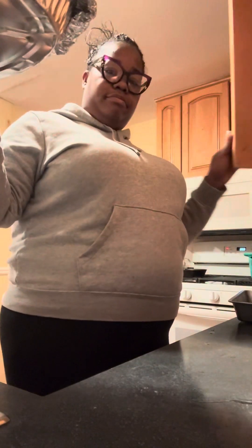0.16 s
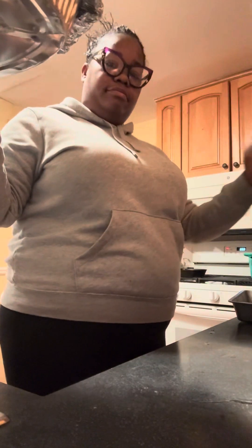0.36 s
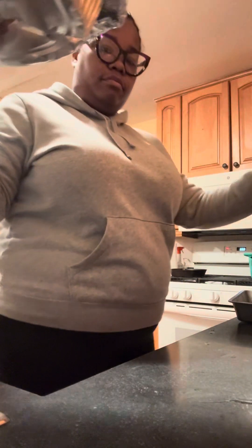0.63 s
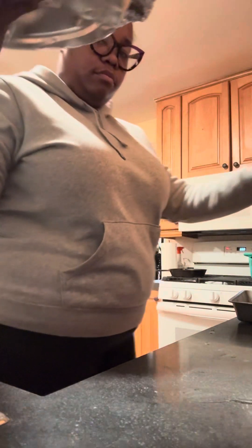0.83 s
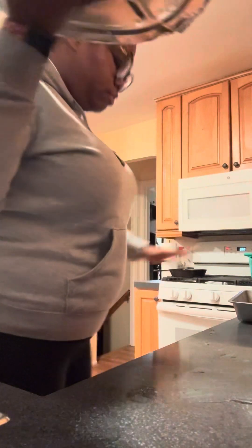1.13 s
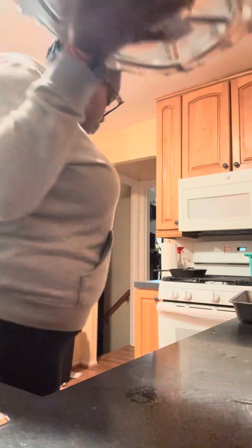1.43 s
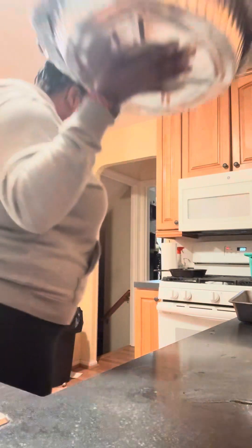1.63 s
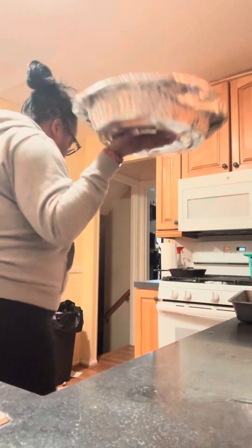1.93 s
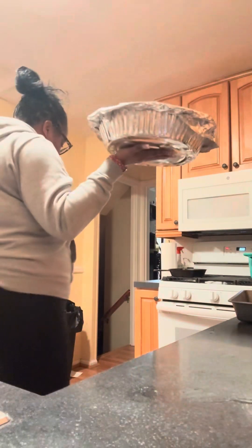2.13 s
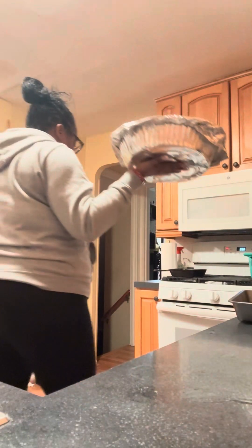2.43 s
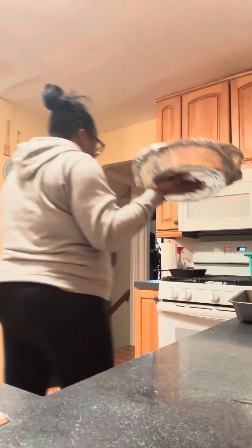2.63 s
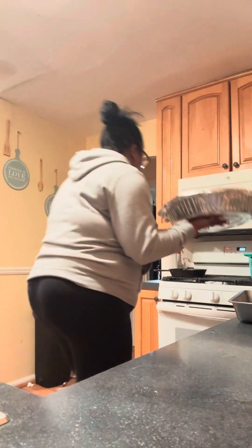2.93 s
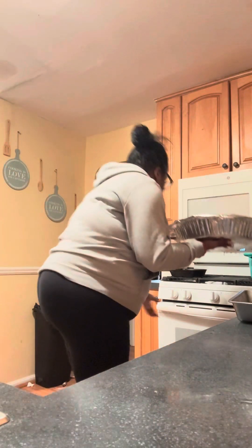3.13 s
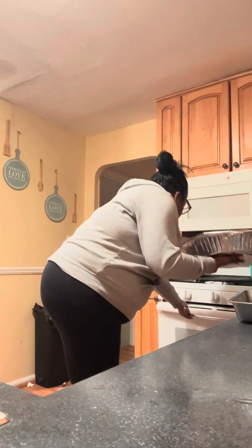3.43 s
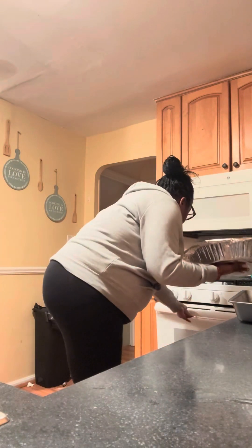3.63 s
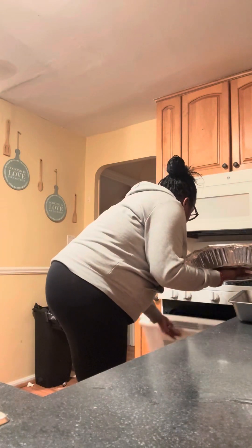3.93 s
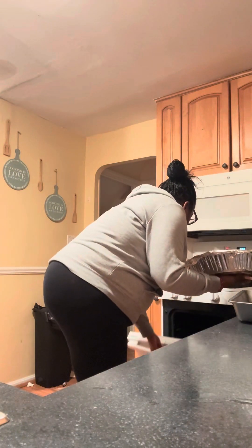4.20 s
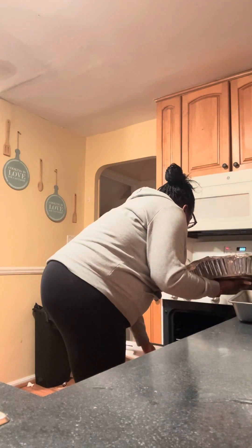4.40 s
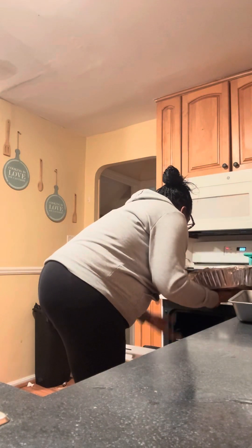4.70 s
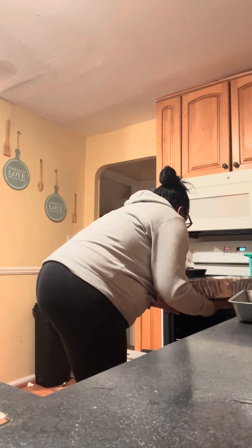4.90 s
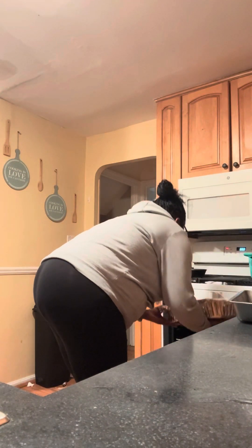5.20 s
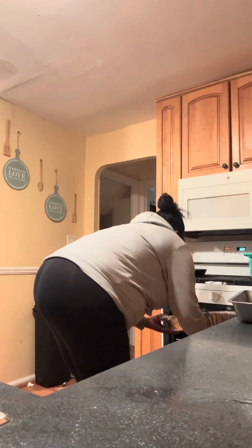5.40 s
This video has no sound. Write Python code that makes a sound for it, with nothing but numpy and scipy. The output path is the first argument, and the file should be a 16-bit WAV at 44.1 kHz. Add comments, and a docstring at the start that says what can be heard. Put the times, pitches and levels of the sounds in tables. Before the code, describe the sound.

Close on a counter in a small, hard-walled kitchen, appliances hum while water drips into a steel bowl and foil crackles. A faint hinge squeaks, then a wooden cupboard bangs very loudly and bounces twice, weaker. Heavy steps and a low floor creak follow. A sheet-metal oven door thumps open and lowers with soft even thuds; the foil pan crinkles and pops at the end.

```python
"""A small kitchen, heard by a phone with two microphone ports lying on the counter.
Appliances hum throughout; foil on a pan rustles, snaps and pops on and off, and a tap drips into a steel bowl.
A hinge sings faintly, then a wooden cupboard door bangs on its frame at 1.1 s and bounces twice.
Heavy steps and a creak follow; at 3 s a sheet-metal oven door thumps, jerks free and sinks in five soft thuds.
The foil-covered pan is lowered to the rack; its base pops at 4.5 s. Noise bursts, modes and echoes make it all."""
import sys
import numpy as np
from scipy import signal
from scipy.fft import rfft, irfft
from scipy.io import wavfile
from scipy.ndimage import uniform_filter1d

SR = 44100
rng = np.random.default_rng(int(sys.argv[2]) if len(sys.argv) > 2 else 0)


def bounce(signal):
    """Save signal as a 16-bit WAV file at the path given by the first command-line argument."""
    frames = np.transpose(np.atleast_2d(signal))
    limited = np.clip(frames, -1, 1)
    pcm = np.round(limited * 32767).astype(np.int16)
    wavfile.write(sys.argv[1], SR, pcm)


N = 244755
TIME = np.arange(N) / SR
AGE = TIME[:SR]  # seconds since a single event began

# wood on wood, spectrum of the blow: f/Hz, level/dB
WOOD_SPECTRUM = [(90, -17.5), (200, 5.5), (330, 2), (500, 1), (650, -2.5), (880, 0), (1030, -7), (1250, -6),
                 (1520, -3.5), (1720, -5), (1950, 0), (2350, 0.5), (3100, -6.5), (4400, -12), (6200, -21),
                 (8000, -51), (12000, -35.5), (16000, -45)]
FLOOR_HZ = 57.04  # the floor's own note
SNAPS_PER_S, POPS_PER_S = 850, 550  # mean rates of buckling in foil and in the pan wall


def amp(db):
    """Decibels to gain."""
    return 10 ** (np.asarray(db) / 20)


def unit(x):
    """Scale to rms 1."""
    return x / np.sqrt(np.mean(x ** 2))


def curve(rows, axis=1):
    """One column of a table, joined by straight lines in time."""
    rows = np.array(rows)
    return np.interp(TIME, rows[:, 0], rows[:, axis])


def during(rows):
    """1 from the first row of a table to the last, otherwise 0."""
    return (TIME > rows[0][0]) & (TIME < rows[-1][0])


def fade(t60):
    """Exponential decay by 60 dB in t60 seconds."""
    return np.exp(-np.log(1000) * AGE / t60)


def swell_in(rise):
    """Exponential build-up with a time constant of rise seconds."""
    return 1 - np.exp(-AGE / rise)


def add(track, s, x):
    """Mix x into the track from time s on."""
    start = max(int(s * SR), 0)
    part = x[..., :max(N - start, 0)]
    track[..., start:start + part.shape[-1]] += part


def convolve(x, response):
    """Filter by an impulse response, keeping the length."""
    return signal.fftconvolve(x, response, axes=-1)[..., :x.shape[-1]]


def walk(rate):
    """Slow chance with a spread of 1, drawn anew rate times a second and smoothed."""
    hold = int(SR / rate)
    steps_held = np.repeat(rng.standard_normal(N // hold + 1), hold)
    smooth = uniform_filter1d(uniform_filter1d(steps_held, hold), hold)
    return unit(smooth[:N])


def click(points, tilt_db=0, size=4096):
    """Minimum-phase pulse of unit energy with a (Hz, dB) spectrum, tilted in dB per octave."""
    octave = np.log2(np.maximum(np.fft.rfftfreq(size, 1 / SR), 1))
    hz, db = np.transpose(points)
    level_db = np.interp(octave, np.log2(hz), db) + tilt_db * octave
    # folding the cepstrum forward in time makes the pulse causal
    cepstrum = irfft(np.log(amp(level_db)))
    cepstrum[1:size // 2] *= 2
    cepstrum[size // 2 + 1:] = 0
    pulse = irfft(np.exp(rfft(cepstrum)))
    return pulse / np.linalg.norm(pulse)


def contact(points, t60, rise=.001, tilt_db=0):
    """A blow: surfaces meet and chatter as a noise burst, coloured by the spectrum of the contact."""
    force = rng.standard_normal(SR) * fade(t60) * swell_in(rise)
    force /= np.linalg.norm(force)
    # as much energy as 10 ms of rms 1
    return convolve(force, click(points, tilt_db)) * np.sqrt(SR / 100)


def ring(modes, ratio=1, tilt_db=0):
    """Modes that build up and die away; the place of the blow tilts their balance (dB per octave)."""
    tones = 0
    for hz, db, t60, rise in modes:
        octaves_up = np.log2(hz / modes[0][0])
        tone = np.sin(2 * np.pi * hz * ratio * AGE)
        tones = tones + amp(db + tilt_db * octaves_up) * tone * fade(t60) * swell_in(rise)
    return tones


def sparkle(modes, spread=0.75, rise=0.0013):
    """High modes of loosely held things: pitch jitters, and each reaches the two ports with its own phase."""
    blur_hz_per_khz = 2
    tones = 0
    for hz, db, t60 in modes:
        ports = rng.uniform(0, 2 * np.pi) + spread * rng.standard_normal((2, 1))
        phase_step = np.sqrt(2 * np.pi * blur_hz_per_khz * hz / 1000 / SR)
        jitter = np.cumsum(rng.standard_normal(SR)) * phase_step
        tones = tones + amp(db) * fade(t60) * np.sin(2 * np.pi * hz * AGE + ports + jitter)
    return tones * swell_in(rise)


def thud(hz, length):
    """A soft push: a few low cycles that swell and fade."""
    swell = (2 * AGE / length) ** 2
    return swell * np.exp(1 - swell) * np.sin(2 * np.pi * hz * AGE)


def buckles(size, snaps_per_s, spread_db):
    """Tiny snaps of very unequal size, at random moments."""
    sizes = amp(spread_db * np.minimum(rng.exponential(size=size), 4)) * rng.standard_normal(size)
    return sizes * (rng.random(size) < snaps_per_s / SR)


def snap_cloud(length, snaps_per_s, spread_db):
    """A cloud of tiny snaps that swells quickly and dies."""
    cloud = swell_in(0.4 * length) * np.exp(-1.8 * (AGE / length) ** 2)
    snaps = buckles(SR, snaps_per_s, spread_db) * cloud
    # as much energy as rms 1 over the length and 3.3 ms more
    return snaps * np.sqrt((length + 0.0033) * SR) / (np.linalg.norm(snaps) + 1e-12)


def diffuse(size):
    """Noise at two nearby microphone ports: alike in the bass, most different around 1 kHz."""
    # difference between the ports: f/Hz, side level/dB
    port_width = [(120, -32), (500, -5.5), (950, 1.5), (1900, -5.5), (5500, -0.5), (10000, -4)]
    mid, side = rng.standard_normal((2, size))
    hz, db = np.transpose(port_width)
    bins_hz = np.maximum(np.fft.rfftfreq(size, 1 / SR), 1)
    gain = amp(np.interp(np.log(bins_hz), np.log(hz), db))
    side = irfft(rfft(side) * gain, size)
    return np.array([mid + side, mid - side])


def kitchen(dry, direct_db, pan_db=0):
    """Direct sound plus the dense echo of hard walls, whose treble dies slightly sooner."""
    t60_s, treble_t60_s = 0.33, 0.32
    echoes = diffuse(SR)
    low = signal.sosfilt(signal.butter(1, 3500, fs=SR, output="sos"), echoes)
    response = low * fade(t60_s) + (echoes - low) * fade(treble_t60_s)
    response *= swell_in(0.00057)
    response /= np.linalg.norm(response[0])
    response[:, 0] += amp(direct_db)  # a nearer source has more direct sound
    ports = np.array([dry * amp(pan_db / 2), dry * amp(-pan_db / 2)])
    return convolve(ports, response)


def appliances():
    """Wavering motor hum over a soft rush of fan and room air; the higher notes waver more."""
    # motor notes: f/Hz, level/dB rms
    motor_notes = [(59.2, -47.5), (124.5, -53.5), (251.5, -55.5), (344.5, -68), (376.8, -66)]
    # spectrum of fan and room air: f/Hz, level/dB
    air_spectrum = [(20, -22.5), (38, -14.5), (55, 8.5), (85, -8.5), (130, -3), (180, -8), (260, -14),
                    (370, -9.5), (500, -15), (750, -19.5), (1200, -29.5), (1700, -29.5), (2400, -29.5),
                    (4000, -40), (6200, -44.5), (8200, -75.5), (10800, -47.5), (16000, -52)]
    # strength of the air: t/s, level/dB
    air_levels = [(0, -49), (1, -50), (2.2, -46.5), (3.4, -46), (4.5, -49), (5.55, -46)]
    hum = 0
    for hz, db in motor_notes:
        waver = np.sqrt(hz / motor_notes[0][0])
        level = np.sqrt(2) * amp(db + waver * walk(7))
        phase = 2 * np.pi * hz * TIME + .35 * waver * walk(5 * waver)
        hum = hum + level * np.sin(phase)
    air = unit(convolve(diffuse(N), click(air_spectrum)[None]))
    return hum + air * amp(curve(air_levels) + .5 * walk(6))


def foil_and_bang_edge(spread_db=2.5):
    """Foil rustles unevenly; clouds of snaps make its flexes and the bright edge of the cupboard's bang."""
    # how much the foil is handled: t/s, level/dB
    handling_levels = [(0, -68), (.3, -68.5), (.6, -74), (2.05, -70), (2.28, -57), (2.45, -65),
                       (2.6, -62.5), (2.9, -75), (3.45, -68), (3.85, -82), (4.7, -82), (4.95, -56.5),
                       (5.12, -60.5), (5.36, -66), (5.55, -53)]
    # bursts: the bright edge of the bang at 1.115 s, otherwise flexing foil:
    # t/s, crackle level/dB, sizzle level/dB, length/s
    treble_bursts = [(0.151, -59.5, -66, 0.025), (0.19, -56.5, -76, 0.0083), (0.973, -69, -69, 0.057),
                     (1.025, -51, -62.5, 0.072), (1.115, -28.5, -43, 0.02), (2.145, -56, -68, 0.03),
                     (2.184, -55.5, -64, 0.09), (2.728, -60, -73, 0.072), (3.016, -44, -55, 0.059),
                     (3.296, -63, -76, 0.028), (4.038, -65, -75, 0.023), (4.336, -66, -72, 0.014),
                     (4.594, -59, -73, 0.022), (4.835, -45.5, -55.5, 0.05), (5.039, -50.5, -65.5, 0.032),
                     (5.172, -63, -61, 0.033), (5.198, -51.5, -66, 0.048), (5.322, -78, -62, 0.033),
                     (5.406, -67, -63, 0.04)]
    # spectra of the two layers: f/Hz, level/dB
    crackle_spectrum = [(400, -5), (700, 7.5), (920, -0.5), (1200, -5), (1700, -6.5), (2350, 7.5),
                        (3800, -1), (5500, -1), (6600, -6.5), (8000, -54.5), (16000, -48)]
    sizzle_spectrum = [(5000, -70.5), (8000, -42.5), (10500, 21), (15000, 16.5), (17000, 14)]
    crackle = unit(buckles(N, SNAPS_PER_S, spread_db)) * amp(curve(handling_levels))
    sizzle = amp(-12) * crackle
    for s, crackle_db, sizzle_db, length in treble_bursts:
        snaps = snap_cloud(length, SNAPS_PER_S, spread_db)
        add(crackle, s, amp(crackle_db) * snaps)
        add(sizzle, s, amp(sizzle_db) * snaps)
    layers = convolve(crackle, click(crackle_spectrum)) + convolve(sizzle, click(sizzle_spectrum))
    return kitchen(layers, direct_db=-5)


def tap_drips():
    """A drop rings the bowl and traps a bubble whose pitch wobbles slightly before it dies."""
    # drips into a steel bowl of water: t/s, bubble f/Hz, bubble level/dB, bowl level/dB
    drip_events = [(0.027, 5570, -52.5, -83), (0.23, 1380, -39, -54), (0.232, 1157, -44.5, -68),
                   (0.722, 3040, -53, -54), (0.967, 3020, -61.5, -66.5), (1.755, 4280, -59.5, -78),
                   (2.638, 2985, -51.5, -54.5), (2.927, 5300, -65, -79), (3.941, 2520, -50.5, -52.5),
                   (3.967, 2644, -57.5, -77), (4.773, 4050, -60, -66)]
    # ring of the bowl: f/Hz, level/dB, t60/s
    bowl_modes = [(1394, 3.5, 0.035), (2103, 10, 0.025), (2540, -2.5, 0.07), (2820, -7.5, 0.1),
                  (3130, -9, .15), (4000, -17, .08), (4700, -22.5, 0.14), (5300, -16.5, .05)]
    bubble_s = 0.017  # how long a bubble sings
    drops = np.zeros(N)
    life = np.exp(-(AGE / bubble_s) ** 2) * swell_in(0.0062)
    for s, hz, bubble_db, bowl_db in drip_events:
        pitch = hz * (1 + .03 * walk(1200)[:SR])
        bubble = np.sin(2 * np.pi * np.cumsum(pitch) / SR) * life
        bowl = sparkle(bowl_modes, rise=0.0063)[0]
        add(drops, s, amp(bubble_db) * bubble + amp(bowl_db) * bowl)
    # the sink is close to the phone, so little of the room is heard
    return kitchen(drops, direct_db=10)


def pan_pops():
    """Ribs of the pan give way and ring its thin wall, tuned anew for each pop; the base pops once."""
    # the ribbed wall pops and rattles: t/s, level/dB, length/s
    rib_pops = [(0.194, -49.5, 0.048), (0.313, -54.5, 0.014), (0.385, -51.5, 0.0096), (2.183, -55, 0.025),
                (2.757, -58, 0.028), (3.516, -57, 0.043), (4.845, -45, 0.029), (4.891, -53, 0.071),
                (5.06, -56, 0.035), (5.203, -54, 0.035), (5.429, -61, 0.016)]
    # ring of the thin aluminium wall: f/Hz, level/dB, t60/s
    wall_modes = [(954, -0.5, 0.024), (1205, -7, 0.036), (1560, 2.5, 0.017), (1866, -2.5, 0.03),
                  (2238, 4, 0.021), (2506, 2, 0.024), (3050, -4, 0.02), (3450, 5, 0.012)]
    # ring of the base as it flips when gripped: f/Hz, level/dB, t60/s
    base_modes = [(920, -42, 0.028), (1080, -41, .03)]
    wall_bend, base_pop_s = .07, 4.5  # spread of the wall's pitch (fraction); time of the base pop
    pops = np.zeros(N)
    for s, db, length in rib_pops:
        bend = 1 + wall_bend * rng.standard_normal()
        wall = sparkle([(hz * bend, mode_db, t60) for hz, mode_db, t60 in wall_modes])[0]
        snaps = snap_cloud(length, POPS_PER_S, spread_db=2.5)
        add(pops, s, amp(db) * convolve(snaps, wall / np.linalg.norm(wall)))
    add(pops, base_pop_s, sparkle(base_modes, rise=0.0043)[0])
    return kitchen(pops, direct_db=-2)


def foil_snaps():
    """A crease flips over with one dry click."""
    # single sharp snaps close to the phone: t/s, level/dB
    snap_events = [(0.197, -48), (4.546, -66.5)]
    # their spectrum: f/Hz, level/dB
    snap_spectrum = [(500, -23), (2000, 10), (3500, -1), (6200, 5), (8000, -26), (12000, -2.5),
                     (16000, -15)]
    snaps = np.zeros(N)
    for s, db in snap_events:
        add(snaps, s, amp(db) * contact(snap_spectrum, t60=0.024, rise=0.0005))
    return kitchen(snaps, direct_db=2.0)


def hinge():
    """The turning hinge sticks and slips: one thin, rough note with jittering pitch and fluttering level."""
    # faint song of the hinge: t/s, f/Hz, level/dB
    hinge_song = [(.3, 2480, -84), (.4, 2540, -74), (.44, 2500, -85), (.53, 2510, -74), (.57, 2510, -64),
                  (.6, 2510, -77), (.68, 2470, -69), (.78, 2420, -77), (.85, 2450, -65), (.92, 2477, -74.5),
                  (1.0, 2450, -81.5)]
    pitch = curve(hinge_song) * (1 + .035 * walk(1100) + .006 * walk(35))
    grip = np.maximum(walk(110) + 2.2, 0)
    song = unit(np.sin(2 * np.pi * np.cumsum(pitch) / SR) * grip)
    return kitchen(song * amp(curve(hinge_song, axis=2)) * during(hinge_song), direct_db=7.0)


def wood_crack(tilt_db):
    """The door's edge meets the frame."""
    return contact(WOOD_SPECTRUM, t60=0.025, rise=0.0055, tilt_db=tilt_db)


def cupboard(crack_pan_db=-1, ring_pan_db=-3, panel_db=-16, shelves_db=3):
    """Each bang cracks on the frame in several contacts, rings panel and shelves, and booms in the carcass."""
    # door hits frame: t/s, crack level/dB, boom level/dB, air thump level/dB, thump f/Hz, boom tilt/(dB/octave)
    slam_events = [(1.1186, -15.5, -3.5, -31, 56.6, 0), (1.5139, -23, -19.5, -12, 95.2, 4.5),
                   (1.824, -35.5, -18.5, -18.5, 55.2, -1.5)]
    # low modes of door and carcass: f/Hz, level/dB, t60/s, build-up/s
    # (the close pair beats, so the boom holds and then drops)
    carcass_modes = [(56.5, 4.5, 0.4, 0.084), (82.93, -10, 0.93, 0.093), (128.2, -5, 0.45, 0.0027),
                     (131.04, 0, 0.43, 0.024), (145, -13.5, 0.44, 0.0076), (170, -11.5, 0.21, 0.052),
                     (205.9, -9, 0.45, 0.047), (240.6, -13.5, 0.41, 0.0087), (301, -26.5, 0.58, 0.0065),
                     (383, -19, 0.31, 0.011), (451.4, -25, 0.47, 0.0081)]
    # ring of the door panel: f/Hz, level/dB, t60/s
    panel_modes = [(883, -1, 0.33), (1367, -7, 0.29), (1529, -9, 0.34), (1884, -4, 0.35), (1960, -1, 0.2),
                   (2056, 0, 0.19), (2239, -6, 0.31), (2449, -3, 0.23), (2702, -9, 0.27), (2842, -4, 0.2),
                   (3542, -12, 0.28), (3967, -13, 0.27), (4296, -25, 0.35), (4678, -12, 0.22),
                   (5179, -20, 0.3), (5696, -21, 0.28)]
    # things on the shelves ring on faintly: f/Hz, level/dB, t60/s
    shelf_modes = [(1272, -24, .75), (1534, -17, .36), (1612, -22, .44), (2022, -21, .4), (2335, -25, .45),
                   (2470, -26, .5), (2590, -28, .45), (2630, -25, .6), (3461, -33, .6), (4385, -33, .6),
                   (4440, -36, .55), (5380, -35, .48), (6115, -42, .42)]
    # further contacts of each bang, the main one at 1.122 s, then catch and panel rattling: t/s, level/dB
    further_contacts = [(1.122, -12.5), (1.142, -22.5), (1.1596, -20), (1.208, -30), (1.5165, -22.5),
                        (1.526, -33), (1.548, -31), (1.566, -39.5), (1.578, -29.5), (1.853, -37.5)]
    # the catch brushes the door just before it lands: t/s, level/dB
    touch_events = [(1.085, -30), (1.113, -28.5), (1.4437, -39.5), (1.506, -26.5)]
    hard_db, dulling = -15.5, 0.061  # a softer crack loses dulling dB per octave for each dB below hard_db
    thump_s = 0.067  # length of the push of trapped air
    sway_s, sway_db, sway_hz = 0.0704, -6, 64  # the cupboard sways back once: delay, relative level, pitch
    touch_boom_db, touch_pitch = 7, 1.33  # a touch rings the carcass higher

    cracks, booms, rings = np.zeros(N), np.zeros(N), np.zeros((2, N))
    for s, crack_db, boom_db, thump_db, thump_hz, tilt_db in slam_events:
        add(cracks, s, amp(crack_db) * wood_crack(dulling * (crack_db - hard_db)))
        add(booms, s, amp(boom_db) * ring(carcass_modes, tilt_db=tilt_db))
        add(booms, s, amp(thump_db) * thud(thump_hz, thump_s))
        add(booms, s + sway_s, amp(thump_db + sway_db) * thud(sway_hz, thump_s))
        add(rings, s, amp(crack_db + panel_db) * sparkle(panel_modes))
        add(rings, s, amp(crack_db + shelves_db) * sparkle(shelf_modes))
    for s, db in further_contacts:
        # tilted duller than the slam cracks
        add(cracks, s, amp(db) * contact(WOOD_SPECTRUM, t60=0.02, rise=0.0018, tilt_db=-3))
        add(rings, s, amp(db + panel_db) * sparkle(panel_modes))
    for s, db in touch_events:
        add(cracks, s, amp(db) * wood_crack(tilt_db=-4.5))
        add(booms, s, amp(db + touch_boom_db) * ring(carcass_modes, touch_pitch))
        add(rings, s, amp(db + panel_db) * sparkle(panel_modes))
    rings = rings * amp(2 * walk(59.36))  # loose things ring unevenly
    ring_pan = amp(np.array([[ring_pan_db], [-ring_pan_db]]) / 2)
    return booms + rings * ring_pan + kitchen(cracks, direct_db=-4.0, pan_db=crack_pan_db)


def floor_sounds():
    """Low thuds through the floor from steps and oven door, shoe taps and a creak of a slipping board."""
    # low thuds through the floor: steps, then two from the oven door at 3.02 and 3.12 s: t/s, level/dB
    floor_thuds = [(1.977, -31.5), (2.124, -33), (2.587, -25.5), (2.807, -31), (3.019, -30), (3.123, -35)]
    # shoe taps on the floor: t/s, level/dB
    shoe_taps = [(2.139, -30), (2.165, -40), (2.584, -45.5)]
    # spectrum of sole on floor: f/Hz, level/dB
    sole_spectrum = [(150, 8.5), (330, -0.5), (480, 5.5), (740, 5.5), (900, -5), (1200, -21.5),
                     (3000, -14.5), (7000, -49), (16000, -38)]
    # a board creaks under the turning foot: t/s, slip rate f/Hz, level/dB
    board_creak = [(2.02, 239, -57), (2.08, 269.4, -47), (2.14, 267.3, -46.5), (2.22, 255, -57)]
    thud_s, board_hz, board_db = 0.073, 134.4, -12  # length; the floorboard's higher note in a thud
    thuds, taps = np.zeros(N), np.zeros(N)
    for s, db in floor_thuds:
        add(thuds, s, amp(db) * (thud(FLOOR_HZ, thud_s) + amp(board_db) * thud(board_hz, thud_s)))
    for s, db in shoe_taps:
        add(taps, s, amp(db) * contact(sole_spectrum, t60=0.026, rise=0.0019))
    slip_hz = curve(board_creak) * (1 + 0.013 * walk(90))
    slip = 2 * np.pi * np.cumsum(slip_hz) / SR
    tone = np.sin(slip) + amp(-1.0) * np.sin(2 * slip)
    creak = during(board_creak) * amp(curve(board_creak, axis=2)) * tone
    return thuds + creak + kitchen(taps, direct_db=-4)


def oven(skin_direct_db=1.0, skin_room_db=-10):
    """The door leaves its seal with a few quick clacks that ring its hollow skin."""
    # the door jerks free and chatters: t/s, ring level/dB, clack level/dB
    oven_knocks = [(3.008, -25.5, -24), (3.026, -23.5, -33), (3.044, -36, -35), (3.0625, -43, -41)]
    # modes of the sheet-metal skin: f/Hz, level/dB, t60/s, build-up/s
    skin_modes = [(126.5, -9.5, 0.47, 0.0085), (168, -6.5, 0.16, 0.013), (235.6, -3.5, 0.23, 0.0095),
                  (339, -3.5, 0.16, 0.0068), (433.3, 6.5, 0.076, 0.0023), (482.5, 3, 0.096, 0.0027),
                  (541, -1.5, 0.091, 0.0036), (648, -11.5, 0.21, 0.0017), (1498, -31, 0.24, .002),
                  (2050, -25, 0.19, 0.0018), (2390, -10, 0.065, 0.0017), (2480, -27, 0.23, .002)]
    # spectrum of a clack: f/Hz, level/dB
    clack_spectrum = [(200, 1.5), (520, 6.5), (800, 3.5), (1150, -6.5), (2400, -7), (3600, -17),
                      (6000, -21), (8000, -60), (12000, -34), (16000, -36)]
    clacks, skin = np.zeros(N), np.zeros(N)
    for s, ring_db, clack_db in oven_knocks:
        add(clacks, s, amp(clack_db) * contact(clack_spectrum, t60=0.031, rise=0.0029))
        add(skin, s, amp(ring_db) * ring(skin_modes))
    return amp(skin_direct_db) * skin + kitchen(clacks + amp(skin_room_db) * skin, direct_db=-4.0)


def judder(count=5):
    """The oven door is lowered in even jerks that thud through the floor."""
    start_s, period_s, length_s, level_db = 3.315, .219, 0.1, -34
    thuds = np.zeros(N)
    for k in range(count):
        add(thuds, start_s + k * period_s, amp(level_db) * thud(FLOOR_HZ, length_s))
    return thuds


def scene():
    """All sources in the kitchen."""
    foil_and_pan = foil_and_bang_edge() + pan_pops() + foil_snaps()
    doors = hinge() + cupboard() + oven() + judder()
    return appliances() + tap_drips() + foil_and_pan + doors + floor_sounds()


def record(dry):
    """The phone drops the deepest rumble, rounds the loudest peaks and cuts the top."""
    top_hz = 15900
    sound = signal.sosfilt(signal.butter(2, 28, "high", fs=SR, output="sos"), dry)
    sound = sound / (1 + sound ** 6) ** (1 / 6)
    return signal.sosfilt(signal.ellip(10, .2, 80, top_hz, fs=SR, output="sos"), sound)


dry = scene()
out = record(dry)
bounce(out)
```